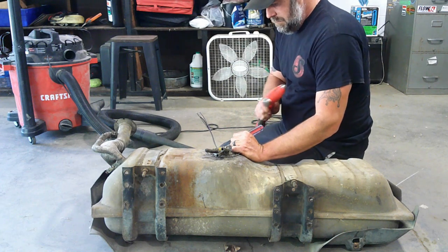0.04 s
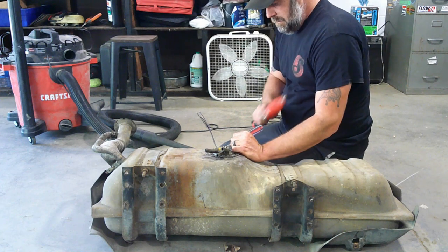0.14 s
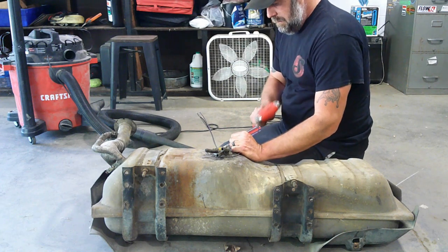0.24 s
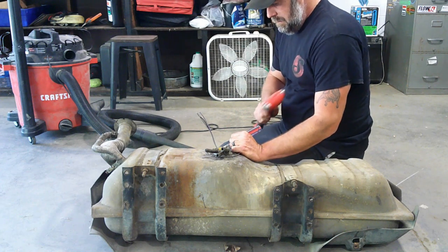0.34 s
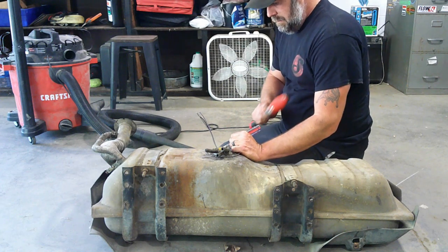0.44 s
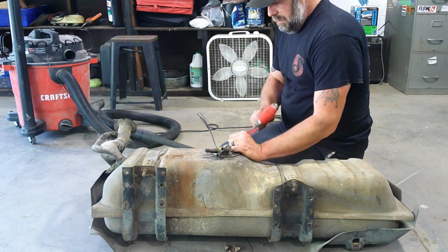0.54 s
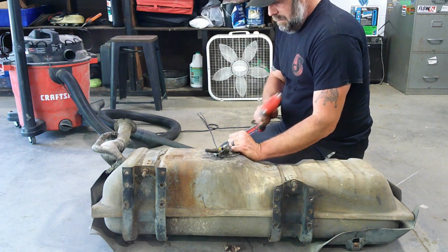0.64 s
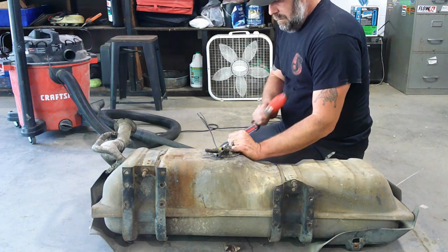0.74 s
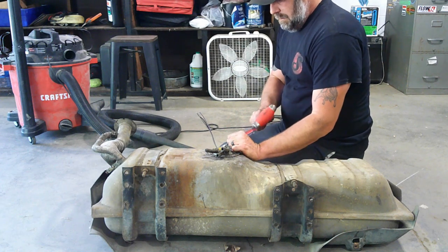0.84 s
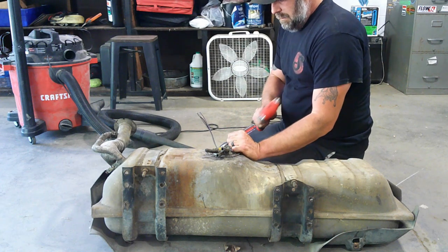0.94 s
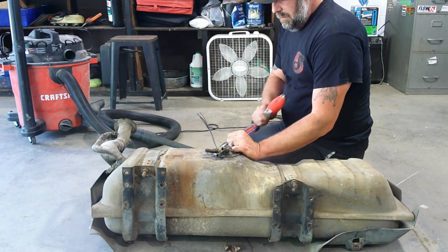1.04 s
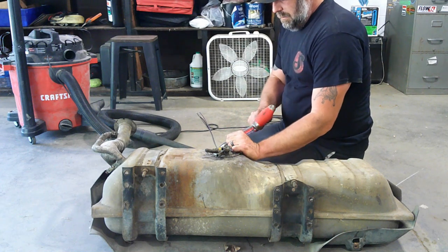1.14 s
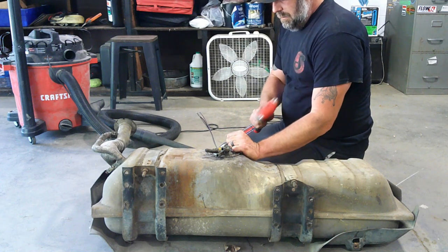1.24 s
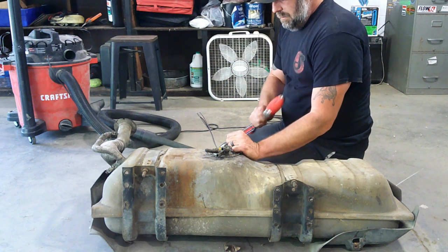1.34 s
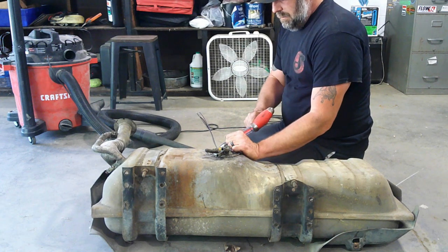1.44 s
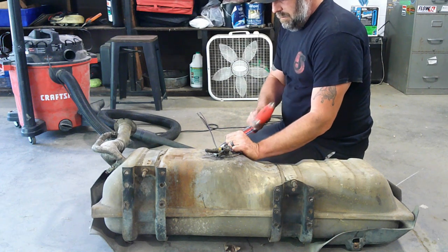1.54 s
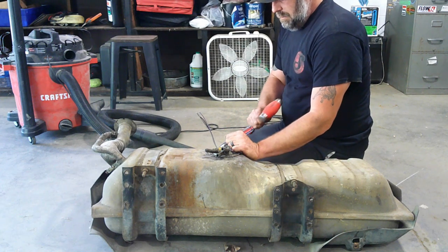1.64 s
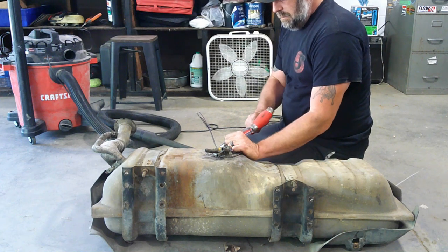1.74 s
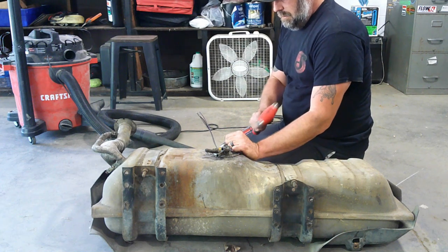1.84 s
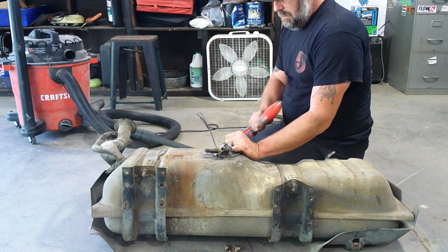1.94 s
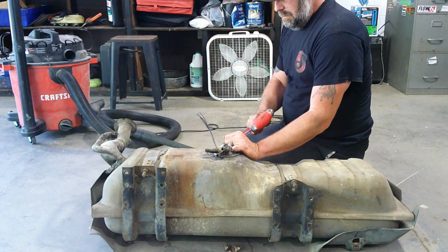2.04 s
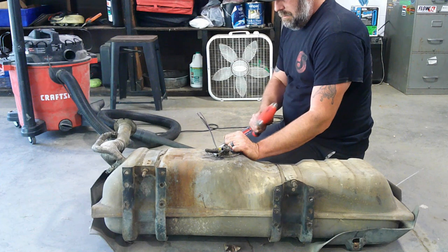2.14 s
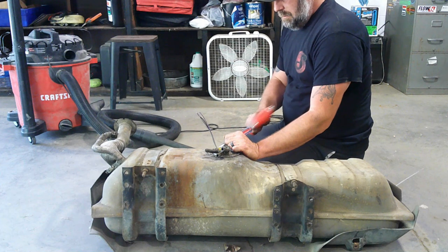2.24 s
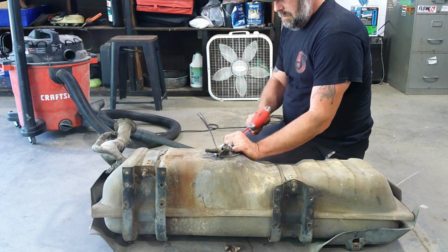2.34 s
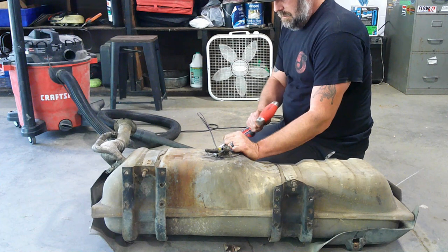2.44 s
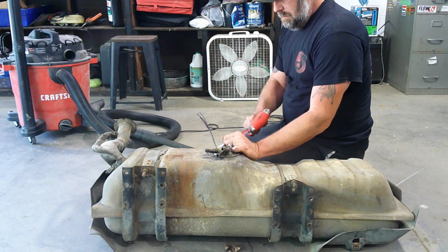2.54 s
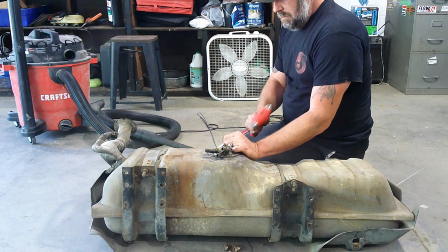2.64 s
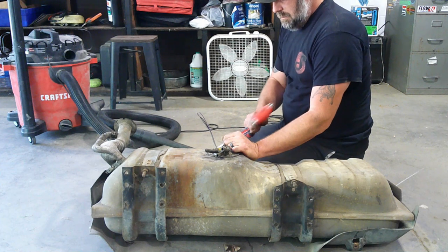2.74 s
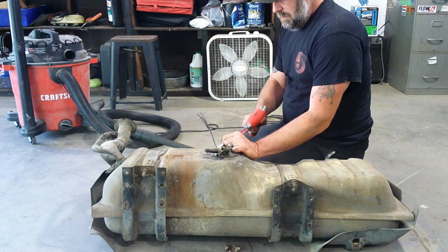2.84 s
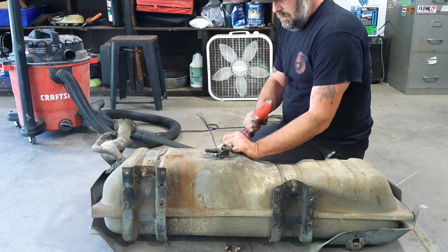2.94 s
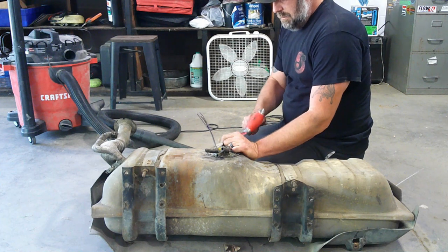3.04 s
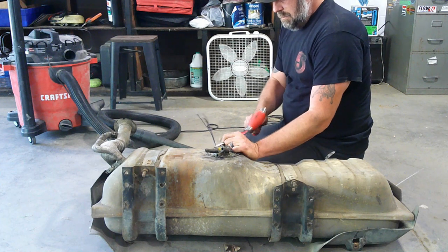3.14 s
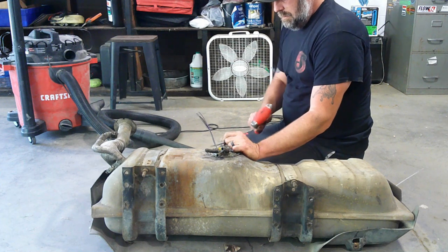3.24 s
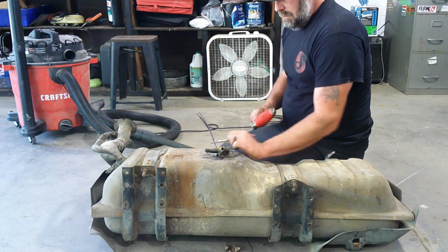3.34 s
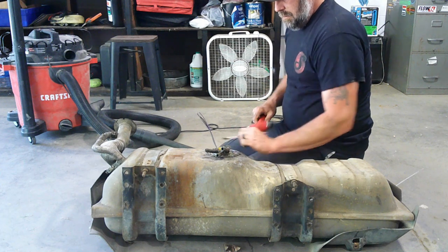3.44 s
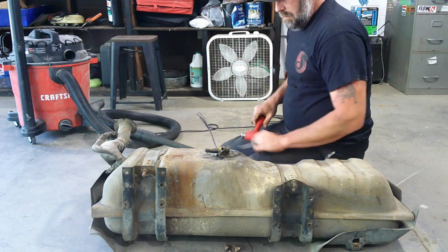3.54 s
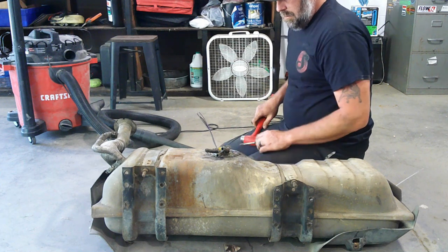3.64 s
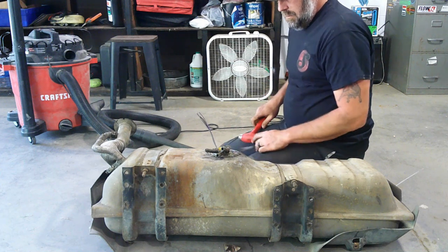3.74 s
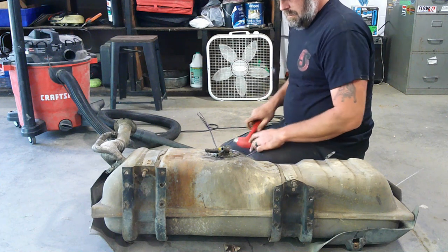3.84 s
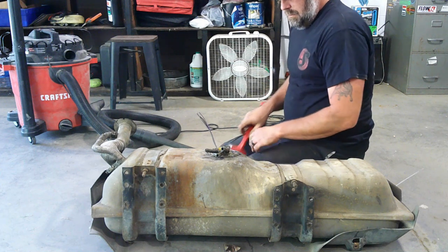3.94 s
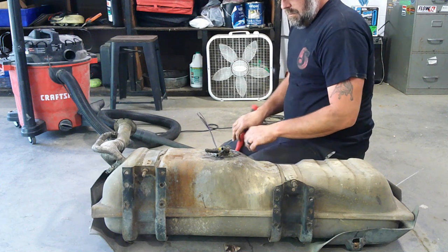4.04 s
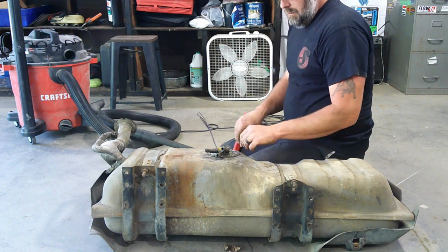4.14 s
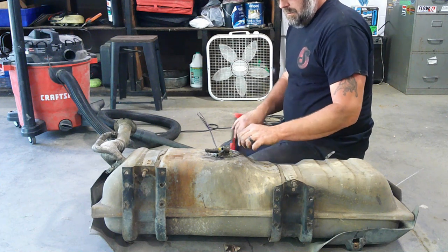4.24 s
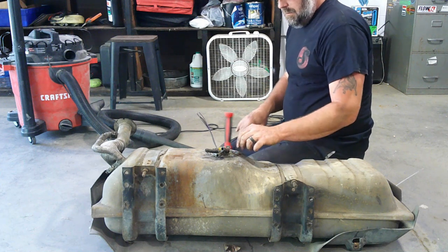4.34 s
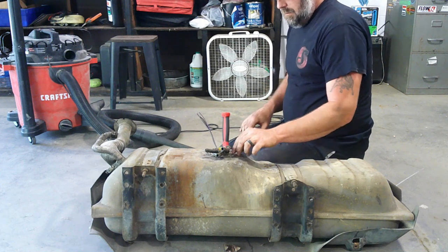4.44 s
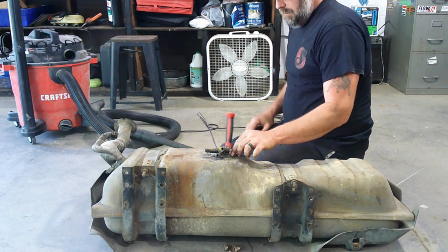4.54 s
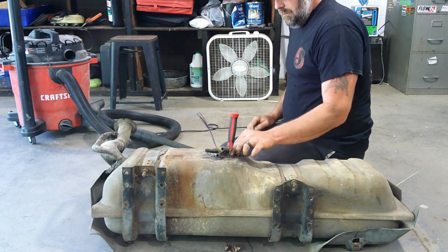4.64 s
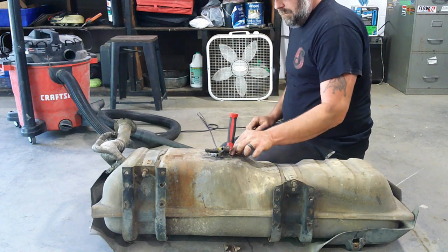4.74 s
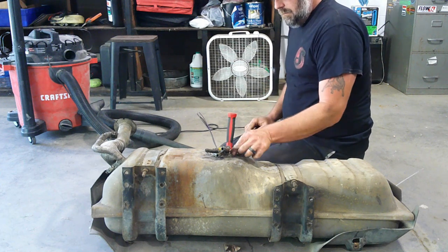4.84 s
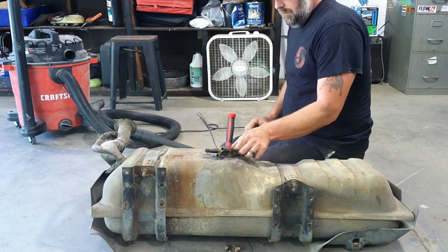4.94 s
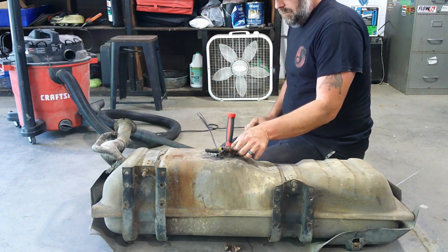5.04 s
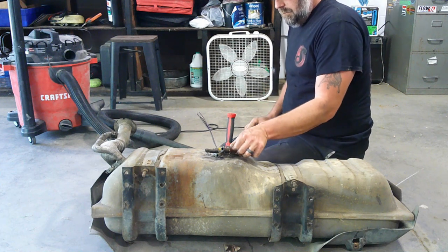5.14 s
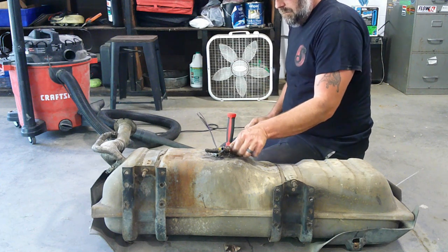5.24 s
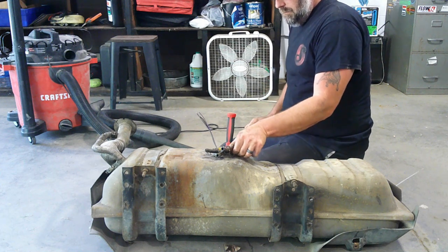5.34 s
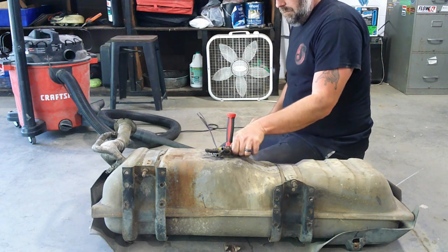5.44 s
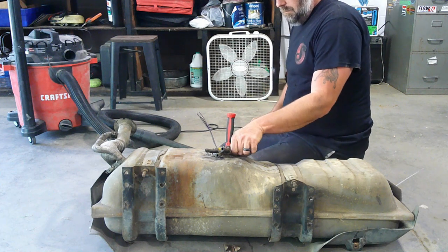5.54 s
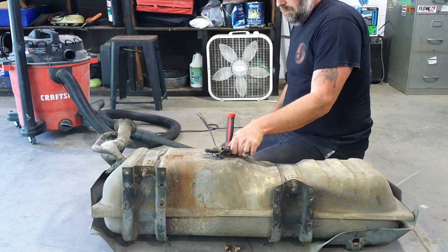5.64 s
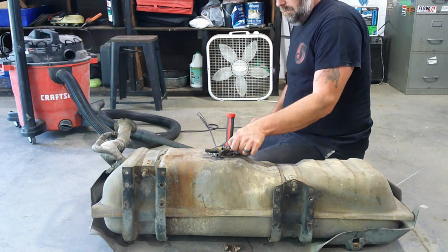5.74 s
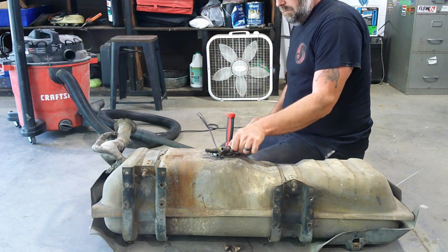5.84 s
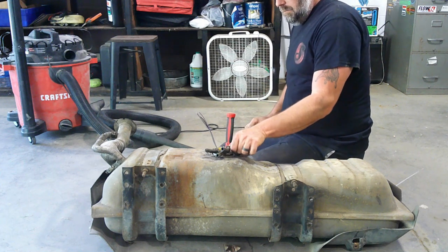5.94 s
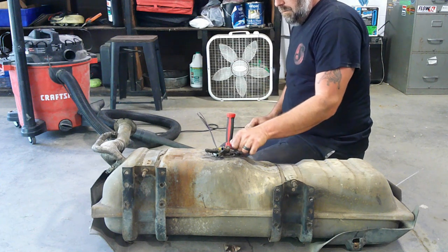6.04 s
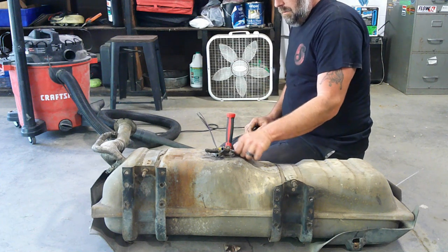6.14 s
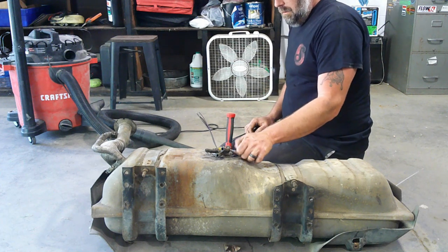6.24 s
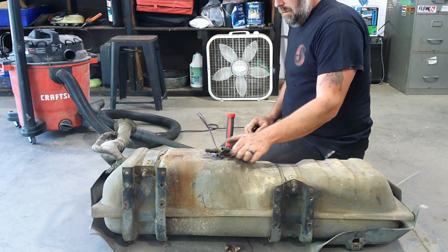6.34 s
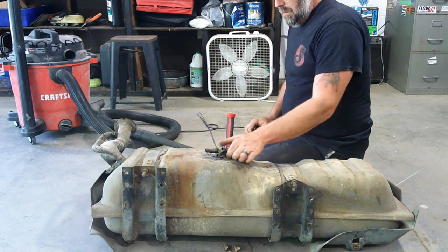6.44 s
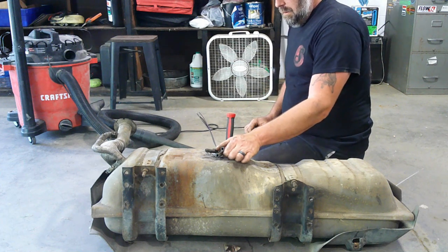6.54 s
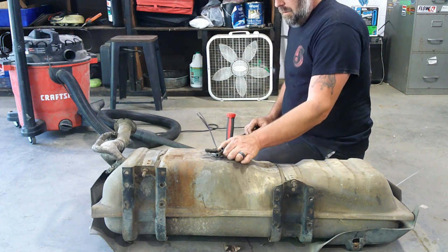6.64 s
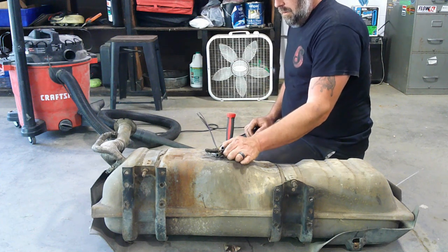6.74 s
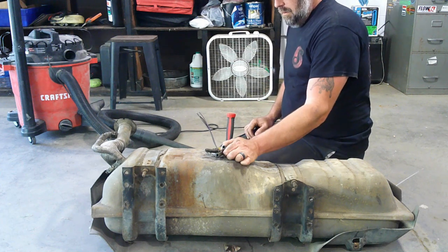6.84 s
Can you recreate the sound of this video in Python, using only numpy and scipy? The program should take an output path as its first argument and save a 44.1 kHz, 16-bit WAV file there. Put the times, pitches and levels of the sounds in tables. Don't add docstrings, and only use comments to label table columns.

```python
import sys
import numpy as np
from scipy import signal
from scipy.fft import rfft, irfft
from scipy.io import wavfile
from scipy.ndimage import uniform_filter1d, minimum_filter1d

SR = 44100
rng = np.random.default_rng(int(sys.argv[2]) if len(sys.argv) > 2 else 0)


def waveform_to_disk(signal):
    frames = np.transpose(np.atleast_2d(signal))
    scaled = np.clip(frames, -1, 1) * 32767
    samples = np.round(scaled).astype(np.int16)
    wavfile.write(sys.argv[1], SR, samples)


def natural_amplitude(level_db):
    exponent = np.asarray(level_db, float) / 20
    return 10 ** exponent


N = 302967
HZ = abs(np.fft.fftfreq(8192, 1 / SR))

# (time [s], level [dB], tank boom [dB], nearest panel's clang [Hz], clang level [dB])
HAMMER_BLOWS = [(0.177, -6, -1, 492, 13), (0.5012, -3.5, -1, 1074, 6), (0.814, -6.5, 1.5, 602, 2.5),
                (1.1236, -4.5, 4, 1020, -2), (1.4226, -4, 6.5, 1010, 3), (1.721, -1.5, -3.5, 646, 11),
                (2.0015, -6, 0, 648, 11), (2.2652, -7, 0.5, 661, 12.5), (2.5288, -5, 0.5, 637, 8),
                (2.7824, -6, 1.5, 1090, 1), (3.033, -6, -2.5, 2220, 6)]
EARLIER_BLOW = (-.13, -11, 2, 660, 3)
# (frequency [Hz], width [Hz], level over the body's broad sound [dB])
TANK_MODES = [(137.8, 17.6, 15), (197, 46, 6), (330, 10.3, 11.5), (368, 17, 7.5), (528.3, 33, 1),
              (610, 43, 2), (792, 22, 5.5), (1093, 103, 5.5), (1313, 84, 4), (1560, 67, 0.5),
              (2434, 83, 0.5), (2770, 240, 0.5), (6390, 200, -8)]
# (frequency [Hz], level against the blow [dB], t60 [s], share of the boom [1])
TANK_PANELS = [(329, -20, 0.35, 1.7), (651, -27, 0.5, .1), (1093, -26, 0.98, 1.1)]
# (time [s], level [dB], clang [Hz], clang level [dB], hardness [dB])
TANK_THUMPS = [
    (0.677, -24.5, 443, 14, -28.5),
    (0.742, -53, 1090, 10, 6),
    (3.227, -49.5, 522, 22, -6),
    (5.12, -50.5, 250, 11, -4),
    (5.847, -55.5, 300, 21.5, 1),
    (5.972, -41, 330, 1, -13),
    (6.574, -39.5, 760, 9.5, -3),
    (6.739, -53, 495, 18, -13),
]
# (time [s], squeak [Hz], level [dB])
PUNCH_SLIDES = [
    [(3.35, 2370, -56), (3.41, 2530, -71.5), (3.448, 2710, -57.5), (3.48, 3010, -58.5),
     (3.505, 3160, -55.5), (3.53, 3270, -67), (3.58, 3210, -62)],
    [(3.72, 1430, -70), (3.82, 1437, -68.5), (3.93, 1450, -62)],
]
# (time [s], level [dB], boom [dB], clang [Hz], hardness [dB])
TOOL_CLATTER = [(3.922, -24.5, -6.5, 921, -15.5), (3.9861, -26.5, 4, 550, 7.5),
                (3.9959, -23, -12, 778, 8.5), (4.0574, -11.5, -7.5, 1490, -4.5),
                (4.0714, -17.5, -1, 1150, 8), (4.1004, -23.5, -5, 1500, 10.5), (4.1084, -19.5, -12, 770, 6),
                (4.1308, -17.5, -36, 770, 0), (4.1791, -4, -3.5, 573, -14), (4.198, -15.5, -27, 1330, -1),
                (4.2579, -20, -18, 1160, 2.5), (4.2695, -19.5, -22, 1280, 6.5), (4.2934, -18, -4, 1350, 0)]
# (time [s], level [dB], band [Hz])
FLAT_SLAP = (4.1793, -7, (280, 3600))
# (frequency [Hz], width [Hz], level over the body's broad sound [dB])
TOOL_MODES = [(794, 16, -1), (1304, 72, 5.5), (2266, 130, 6), (2846, 130, 8.5), (3220, 530, 6),
              (3930, 190, 10.5), (4114, 240, 8), (4950, 420, -1), (6370, 190, 4.5)]
# (time [s], frequency [Hz], level [dB], t60 [s])
STEEL_PINGS = [
    (3.996, 764, -36, 1.2),
    (4.1094, 770, -36, .3),
    (4.072, 3980, -30, .45),
    (6.205, 3480, -47, .8),
    (3.922, 2290, -43, .4),
]
# (time [s], level [dB], boom [dB], hardness [dB])
RING_NUDGES = [
    (4.8095, -38, -14, -2),
    (5.1102, -34.5, 4, 2),
    (5.1402, -40, -3, -10),
    (5.401, -45, 7, -10),
    (5.6145, -38, 11, 4),
    (5.6386, -36, 4, -16.5),
    (5.847, -39, -6, -9),
    (5.9699, -29.5, -10, -19),
    (5.998, -35.5, 6, -4),
    (6.5673, -39.5, 13.5, 0.1),
]
# (time [s], level [dB])
RING_RATTLE = [
    (6.0897, -18.5),
    (6.104, -24.5),
    (6.1585, -19),
    (6.1698, -24),
    (6.2057, -23),
    (6.2311, -28),
]
# (frequency [Hz], width [Hz], level over the body's broad sound [dB])
RING_MODES = [(330, 45, 1), (1077, 61, 14.5), (1840, 170, -9), (2390, 170, 9), (2714, 81, 9), (3520, 29, 9),
              (4000, 150, 5), (6420, 320, 4.5)]
# (band [Hz], t60 [s], build-up [s], level [dB])
GARAGE_BANDS = [(124, 0.58, 0.026, 5.5), (302, 0.76, 0.011, 7), (750, 0.99, 0.002, 6.5),
                (1630, 0.83, 0.0013, 9.5), (4420, 0.67, 0.009, 6), (8330, 0.36, 0.0011, 3.5)]
# (delay [s], level [dB])
GARAGE_BOUNCES = [(.0035, -23.5), (.007, -11.5), (0.0127, -22.5), (.018, -11.5), (0.022, -15)]
# (frequency [Hz], level [dB])
BLADE_TONES = [(113.6, -43.5), (227.5, -47), (341, -61.5), (456, -65.5)]
# (frequency [Hz], density [dB per Hz])
AIR_SPECTRUM = [(20, -36), (80, -21.5), (110, -17), (190, -14), (300, -15.5), (600, -19), (1500, -28.5),
                (3000, -36.5), (4300, -43), (5100, -49), (6300, -44), (7800, -45), (8600, -60),
                (9600, -109)]
# (frequency [Hz], gain [dB])
MIC_RESPONSE = [(40, -27.5), (110, 0.5), (250, 7.5), (2500, -1), (3500, -4), (4200, -4), (5100, -8.5),
                (6300, -1), (7500, -16.5), (8400, -26), (9200, -65.5), (16000, -111)]


def hammer_blows(steel):
    for s, db, boom_db, clang_hz, clang_db in [EARLIER_BLOW] + list(HAMMER_BLOWS):
        row = (s, db, boom_db, clang_hz, clang_db, 0.1 + 0.86 * db)
        add(steel, *knock(row, TANK_MODES, level_db=19, crack_db=-8, crack_s=0.0028, crack_hz=700,
                          clang_width=122, wet_db=1))
        for hz, panel_db, t60, share in TANK_PANELS:
            add(steel, *ping(s, hz, db + panel_db + share * boom_db, t60))
        add(steel, *tick(s, db, (2120, 7000)))


def knock(row, modes, level_db, crack_db, crack_s, crack_hz, clang_width, wet_db):
    s, db, boom_db, clang_hz, clang_db, hard_db = row
    sound = garage(wet_db)
    t = np.arange(len(sound)) / SR
    crack = rng.standard_normal(len(t)) * np.exp(-t / crack_s) * (1 - np.exp(-t / 0.00081))
    crack_band = signal.butter(1, [crack_hz, 7000], "band", fs=SR)
    sound += natural_amplitude(crack_db) * signal.lfilter(*crack_band, crack)

    all_modes = list(modes) + [(clang_hz, clang_width, clang_db)]
    hz, width, mode_db = np.transpose(all_modes)[:, :, None]
    place = 1 + .22 * rng.standard_normal(hz.shape)
    peaks = place * mode_db / (1 + (2 * (HZ - hz) / width) ** 2)
    drum = 0.75 * boom_db / (1 + (2 * (HZ - 330) / 70) ** 2)
    ringing = drum + peaks.sum(0)
    body = read([(250, boom_db), (900, 0.71 * boom_db), (2200, 0.019), (5000, hard_db)], HZ)

    fresh = np.exp(-t / 0.1)
    early = colour(sound * fresh, body + 1.026 * ringing)
    late = colour(sound * (1 - fresh), body + 0.86 * ringing)
    return s, natural_amplitude(db + level_db) * (early + late)


def ping(s, hz, db, t60):
    t = np.arange(SR) / SR
    off, phase, near_phase = rng.random(size=3)
    near_hz = hz * (1.01 + .02 * off)
    mode = np.sin(2 * np.pi * (hz * t + phase))
    neighbour = 0.46 * np.sin(2 * np.pi * (near_hz * t + near_phase))
    swell = 1 - np.exp(-t / 0.024)
    return s, natural_amplitude(db - 60 * t / t60) * swell * (mode + neighbour)


def tick(s, db, band_hz):
    size = round(0.0072 * SR)
    noise = rng.standard_normal(size) * signal.windows.tukey(size, .4)
    return s, natural_amplitude(db - 9) * signal.lfilter(*signal.butter(2, band_hz, "band", fs=SR), noise)


def tank_thumps(steel):
    for s, db, clang_hz, clang_db, hard_db in TANK_THUMPS:
        row = (s, db, 13, clang_hz, clang_db, hard_db)
        add(steel, *knock(row, TANK_MODES, level_db=18.0, crack_db=-17.5, crack_s=0.017, crack_hz=203,
                          clang_width=116, wet_db=-1.5))


def squeak(rows):
    s, hz, db = np.transpose(rows)
    t = np.arange(s[0], s[-1], 1 / SR)
    jitter = 1 + .02 * uniform_filter1d(rng.standard_normal(len(t)), 200)
    tone = np.sin(2 * np.pi * np.cumsum(np.interp(t, s, hz) * jitter) / SR)
    level = natural_amplitude(np.interp(t, s, db) + 3.5) * signal.windows.tukey(len(t), .1)
    room = garage(wet_db=-4)
    room[0] = 2.5
    return s[0], signal.fftconvolve(level * tone, room)


def tool_clatter(steel):
    for s, db, boom_db, clang_hz, hard_db in TOOL_CLATTER:
        row = (s, db, boom_db, clang_hz, 5.5, hard_db)
        add(steel, *knock(row, TOOL_MODES, level_db=14.5, crack_db=-8.0, crack_s=0.0028, crack_hz=446,
                          clang_width=130, wet_db=1))
    add(steel, *tick(*FLAT_SLAP))


def loose_ring(steel):
    knocks = [(s, db, boom_db, 1420, -2, hard_db) for s, db, boom_db, hard_db in RING_NUDGES]
    knocks += [(s, db, -0.5, 2460, 0.5, -5) for s, db in RING_RATTLE]
    for row in knocks:
        add(steel, *knock(row, RING_MODES, level_db=15.5, crack_db=-13.0, crack_s=0.0047, crack_hz=800,
                          clang_width=120, wet_db=-1.5))


def garage(wet_db, size=32768):
    t, hz = np.arange(size) / SR, np.fft.rfftfreq(size, 1 / SR)
    noise = rfft(rng.standard_normal(size))
    centres = [row[0] for row in GARAGE_BANDS]
    shares = np.eye(len(centres))
    tail = np.zeros(size)
    for share, (_, t60, build_s, db) in zip(shares, GARAGE_BANDS):
        band = irfft(noise * read(list(zip(centres, share)), hz))
        tail += band * natural_amplitude(db - 60 * t / t60) * (1 - np.exp(-t / build_s))
    crowding_db = 5.64 * np.exp(-t / 0.023)
    tail *= natural_amplitude(wet_db + crowding_db) / np.sqrt(SR / 20)
    for s, db in GARAGE_BOUNCES:
        tail[round(s * rng.uniform(.8, 1.2) * SR)] += natural_amplitude(db) * rng.choice([-1, 1])
    return tail


def fan():
    t, hz = np.arange(N) / SR, np.fft.rfftfreq(N, 1 / SR)
    wash = irfft(rfft(rng.standard_normal(N)) * natural_amplitude(read(AIR_SPECTRUM, hz)), N)
    gusts_db = .7 * wander(4)
    turns = np.cumsum(1 + 0.00695 * wander(3)) / SR
    unshade_db = 4 / (1 + np.exp((4.9 - t) / .3))
    tones = np.zeros(N)
    for k, (tone_hz, db) in enumerate(BLADE_TONES):
        wobble_db = 1.1 * (k + 1) * wander(5)
        if k > 0:
            wobble_db += unshade_db
        tones += natural_amplitude(db - 0.5 + wobble_db) * np.sin(2 * np.pi * tone_hz * turns)
    return natural_amplitude(-45.5 + gusts_db) * evened(wash) + tones


def wander(rate_hz):
    steps = rng.standard_normal(400)
    return np.interp(np.arange(N) / SR * 2 * rate_hz, np.arange(400), steps)


def evened(x):
    return x / np.sqrt(np.mean(x ** 2) + 1e-20)


def read(points, hz):
    f, value = np.transpose(points)
    return np.interp(np.log(hz + 1), np.log(f + 1), value)


def colour(x, db):
    log_response = np.conj(signal.hilbert(db * np.log(10) / 20))
    taps = np.fft.ifft(np.exp(log_response)).real[:4096]
    return signal.fftconvolve(x, taps * np.hanning(8192)[4096:])[:len(x)]


def add(mix, s, sound):
    at = round(s * SR)
    sound = sound[max(-at, 0):]
    part = mix[max(at, 0):][:len(sound)]
    part += sound[:len(part)]


def scene():
    steel = np.zeros(N)
    hammer_blows(steel)
    tank_thumps(steel)
    for rows in PUNCH_SLIDES:
        add(steel, *squeak(rows))
    tool_clatter(steel)
    loose_ring(steel)
    for row in STEEL_PINGS:
        add(steel, *ping(*row))
    return (colour(steel, read(MIC_RESPONSE, HZ)) + fan())[None]


def roll_off(x):
    return signal.sosfilt(signal.butter(12, 16550, fs=SR, output="sos"), x)


def record(dry):
    ceiling, headroom_db = .722, 1.03
    size = max(round(0.0017 * SR), 3)
    gain = np.minimum(ceiling * natural_amplitude(headroom_db) / (abs(dry) + 1e-9), 1)
    gain = uniform_filter1d(minimum_filter1d(gain, size), size)
    mix = np.clip(dry * gain, -ceiling, ceiling)
    return roll_off(mix)


dry = scene()
out = record(dry)
waveform_to_disk(out)
```